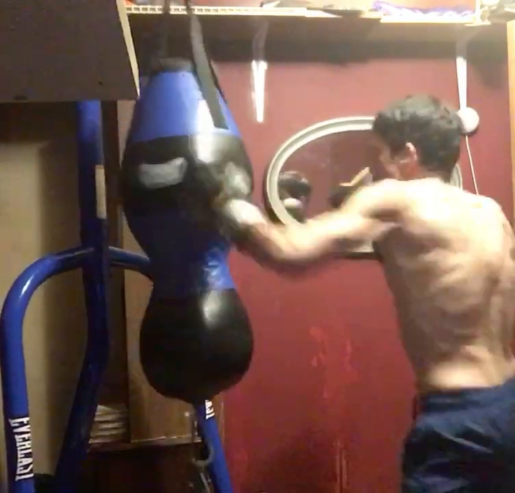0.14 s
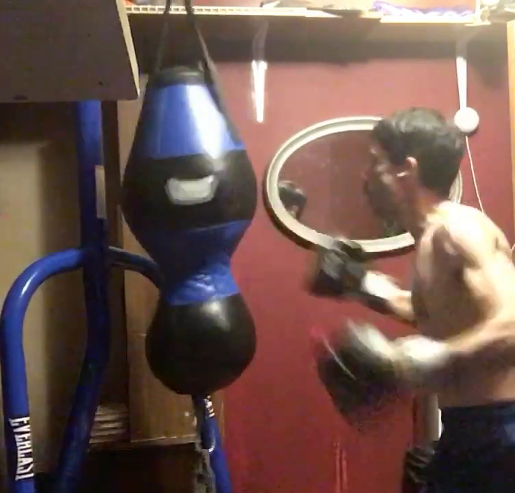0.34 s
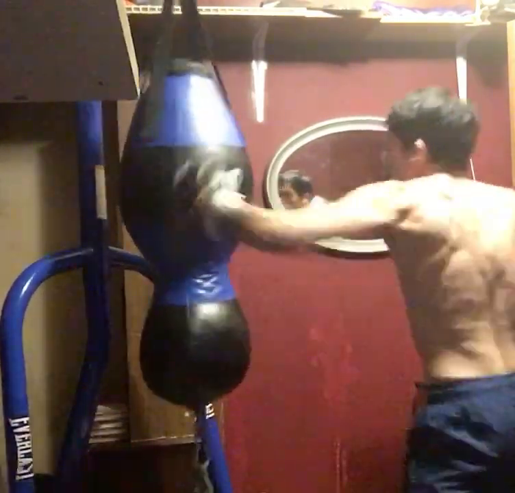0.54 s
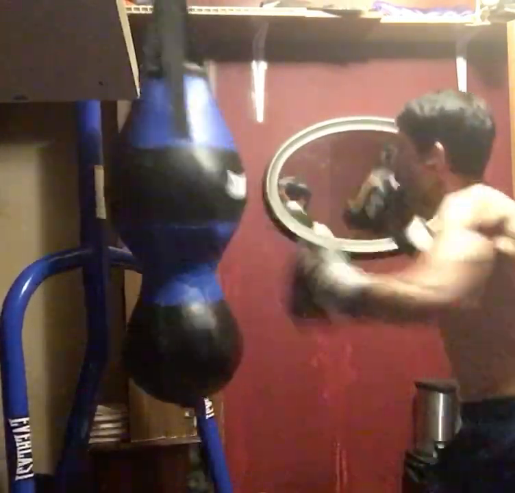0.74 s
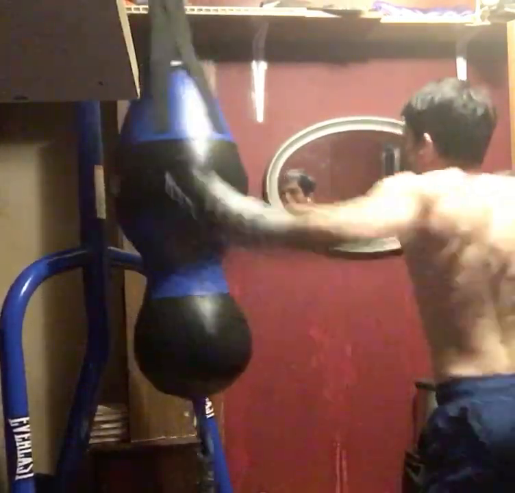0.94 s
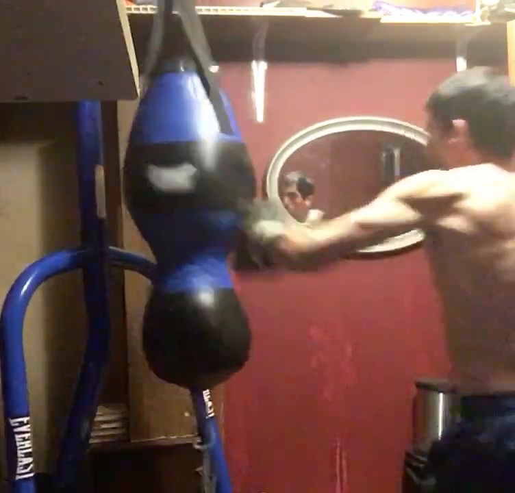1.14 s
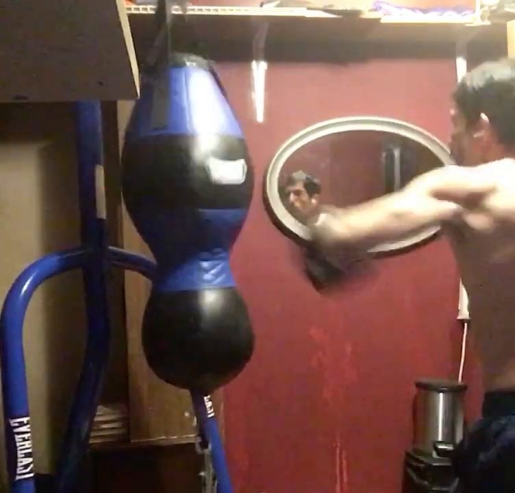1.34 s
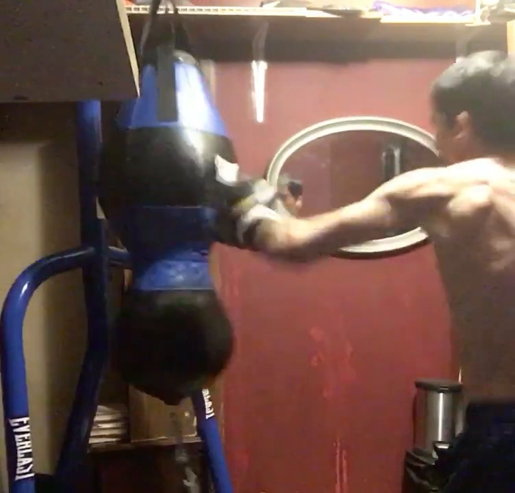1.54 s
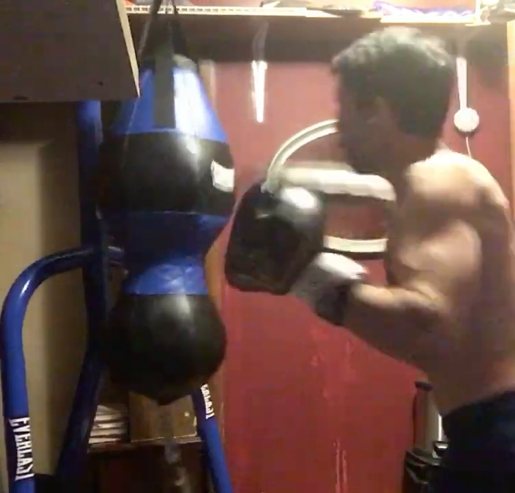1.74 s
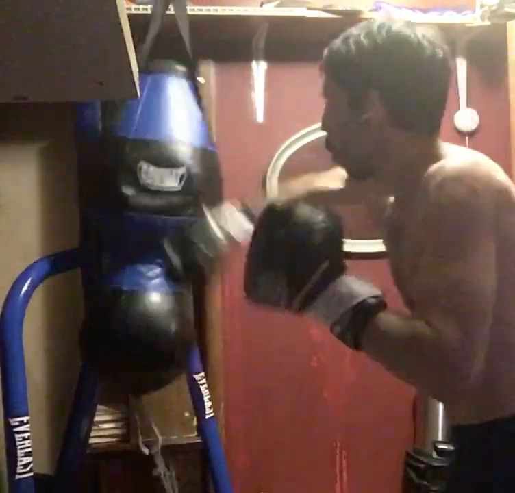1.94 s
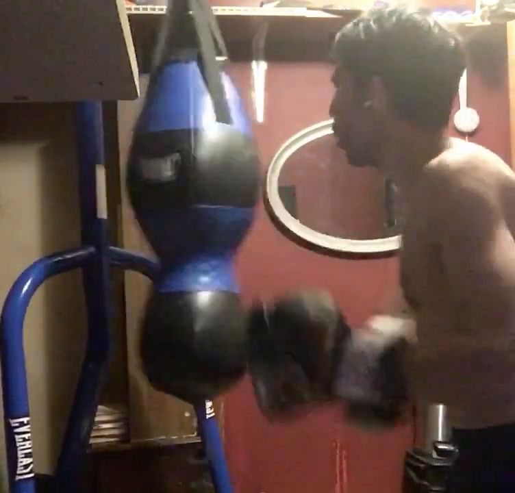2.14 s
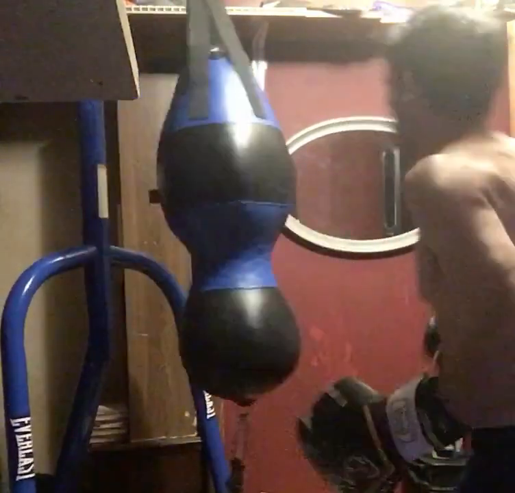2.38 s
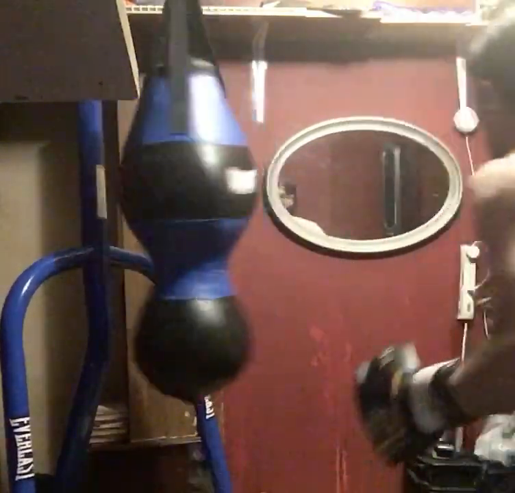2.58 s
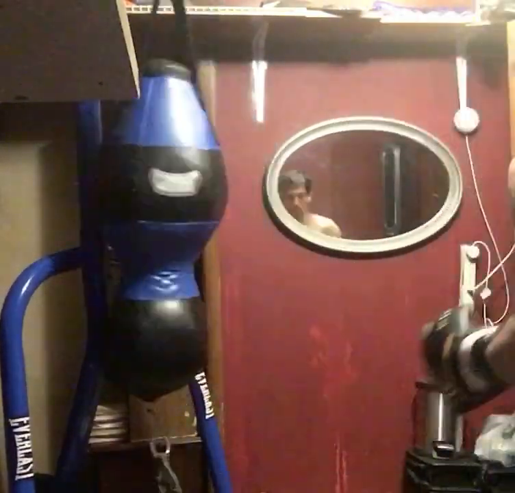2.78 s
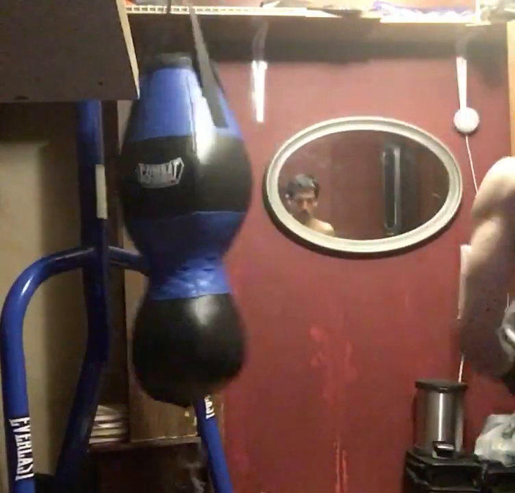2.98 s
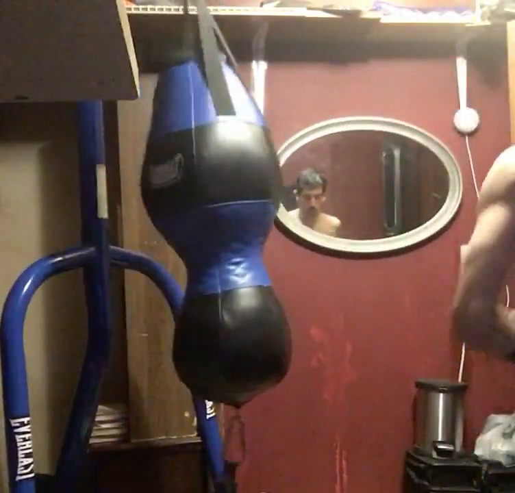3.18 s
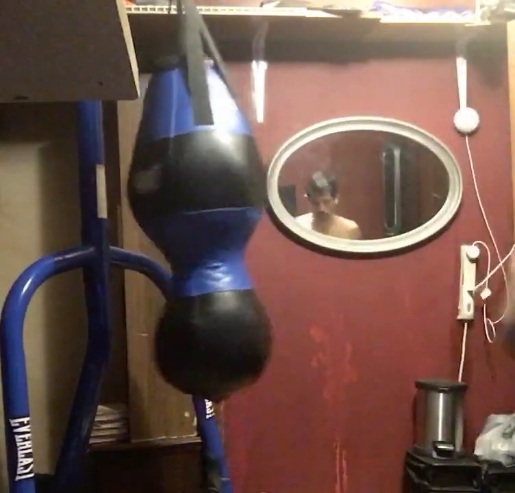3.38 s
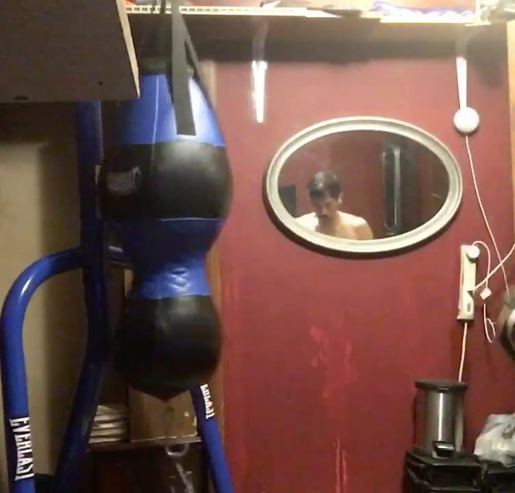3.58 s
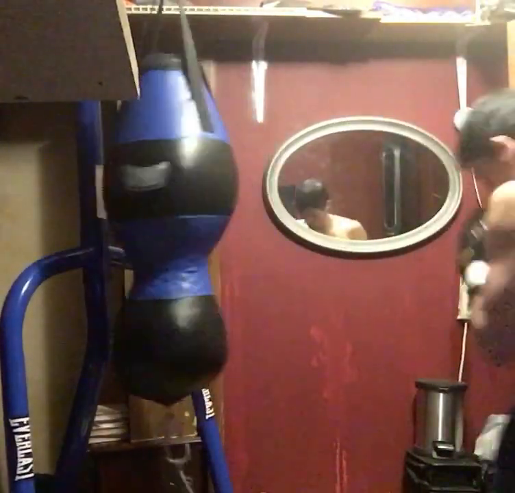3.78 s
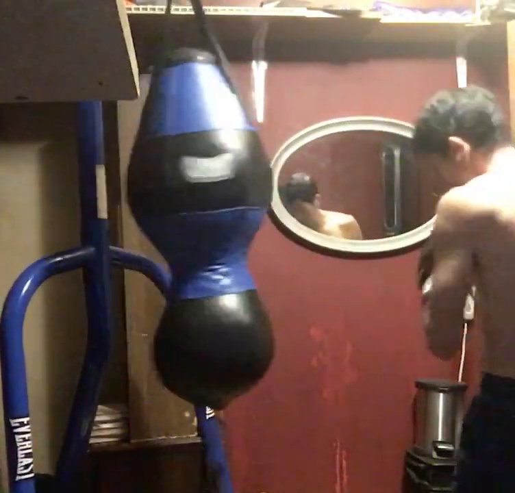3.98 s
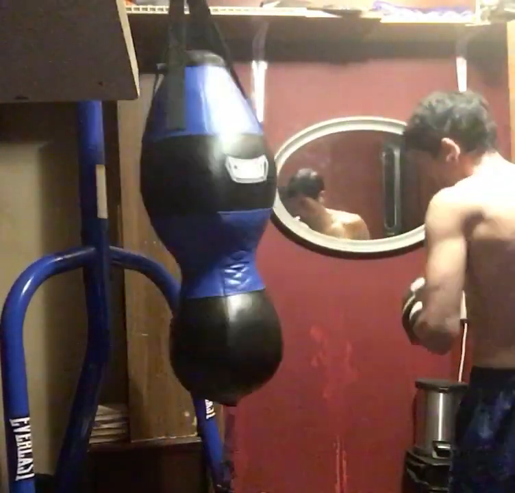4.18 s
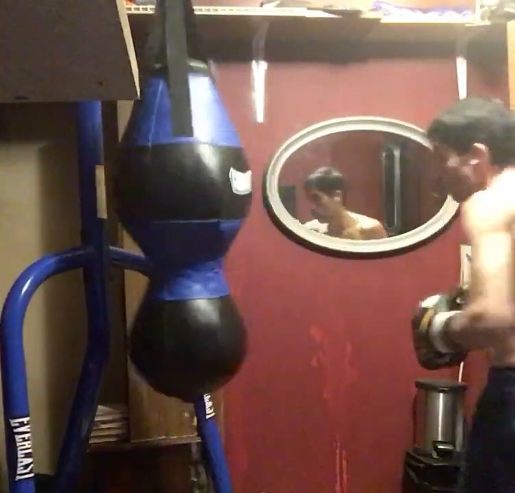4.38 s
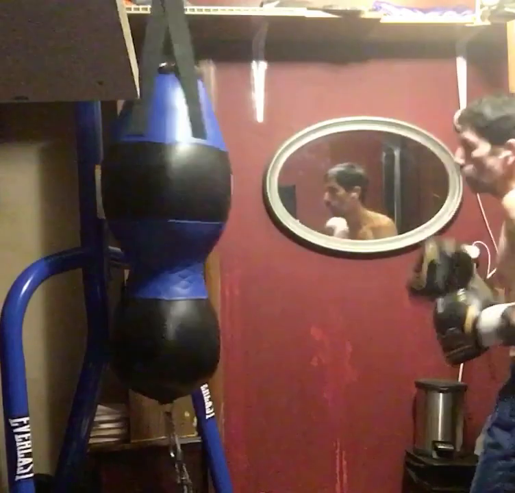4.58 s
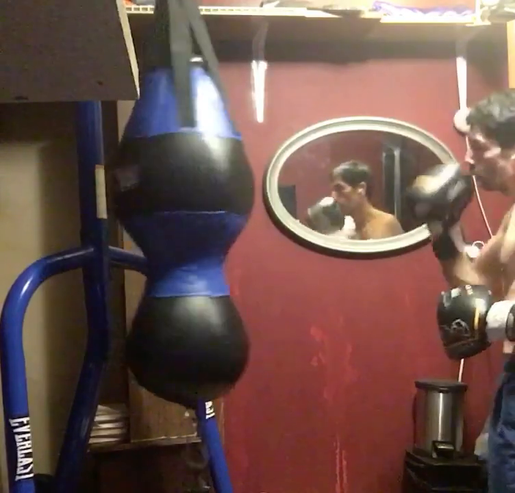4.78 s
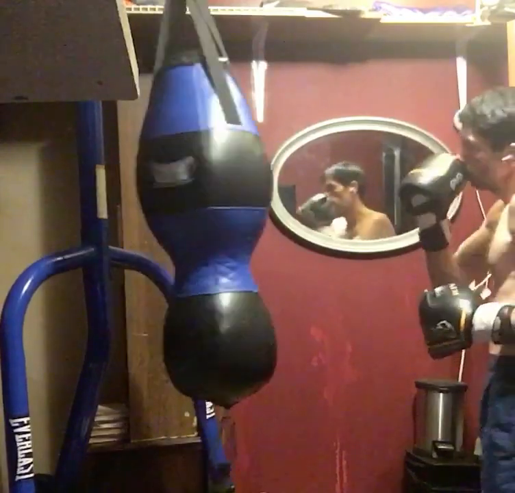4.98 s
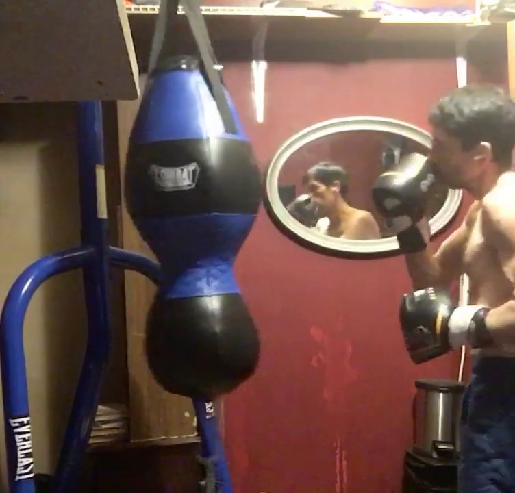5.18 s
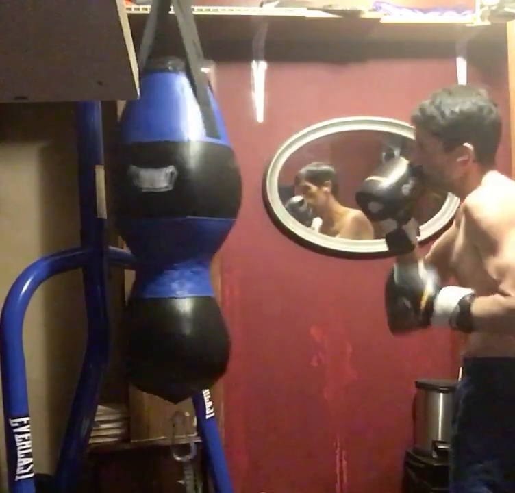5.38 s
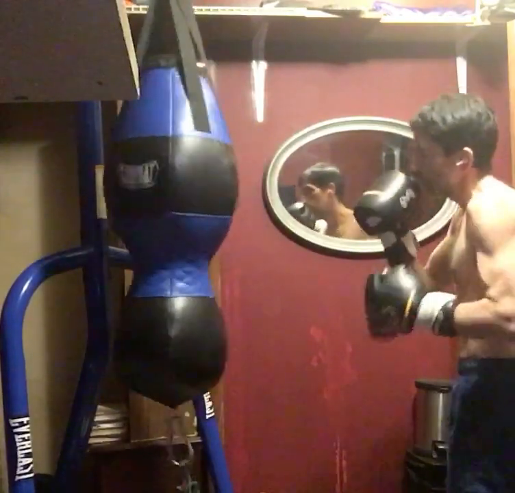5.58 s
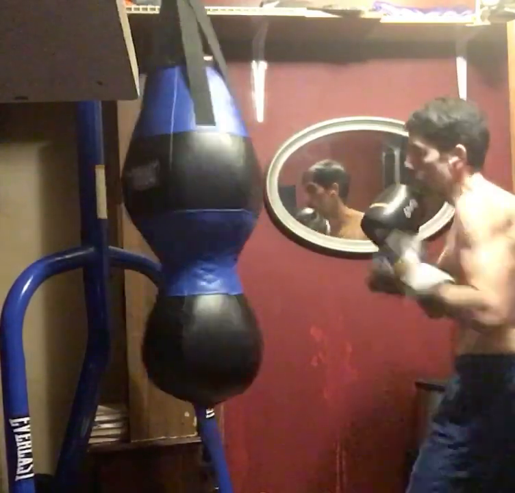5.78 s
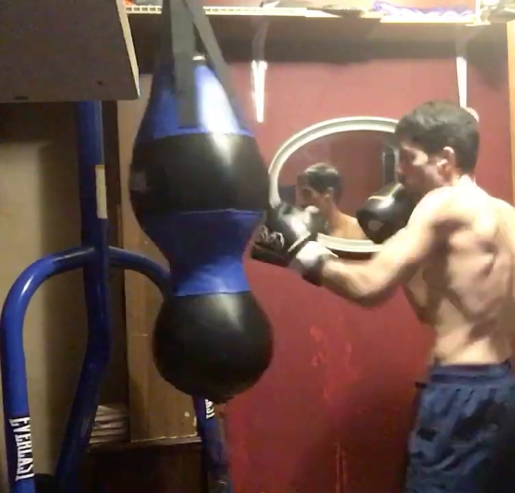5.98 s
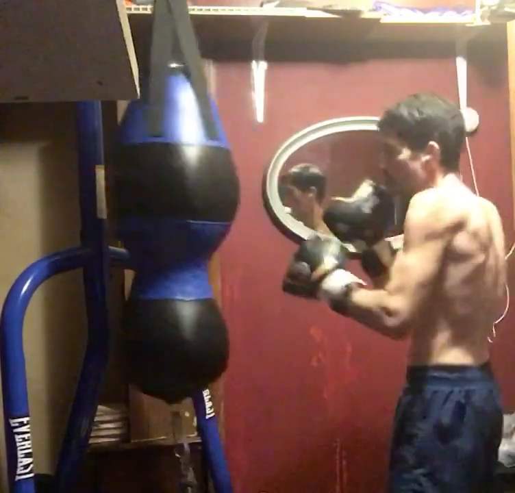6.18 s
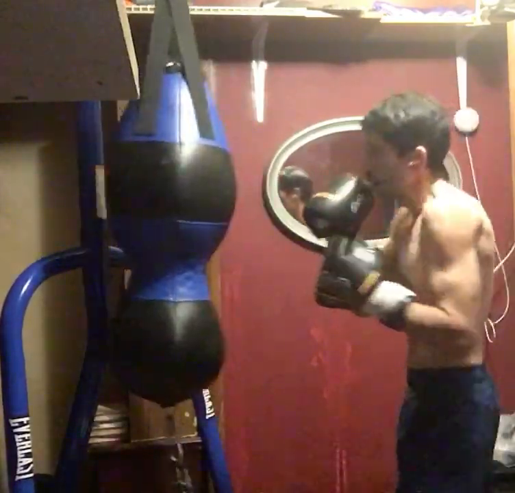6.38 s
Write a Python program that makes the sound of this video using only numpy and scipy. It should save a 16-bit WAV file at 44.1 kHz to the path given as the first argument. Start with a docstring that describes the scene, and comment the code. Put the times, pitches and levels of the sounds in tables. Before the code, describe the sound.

A small hard-walled room with quiet low room noise, faint cloth rustle and a short echo. Gloved punches hit a hanging bag at about 0.0, 0.5, 0.9, 1.35 and 1.7 seconds: sharp leather cracks with brief hiss and a hollow low ring, the fourth softer. Quick swishes lead into all but the first. Between them shoes scuff, the stand and chain rattle, feet bump, the hook squeals thinly and straps creak. From 1.75 to 2.9 the rattling continues, with a steel ring tinking high from 1.85 and a bright rubber sole squeak at 2.2. From 3 to 5 it is nearly quiet: faint rubbing, wavering metal squeals near 3.7 and 4.1, weak creaks, a dull bump. A small knock comes at 5.4, one soft punch at 5.8, then slight rattles until 6.4. A small nearby microphone gives thin bass and slightly squashed peaks.

```python
"""Over quiet room noise and a faint rustle, gloved punches land on a hanging bag: leather hiss and a ringing body.
From the start shoes scuff and the stand rattles (grainy noise), a hook squeals (wavering tones), feet and
stand bump (low noise) and straps creak (rough partials); a swish of noise comes before all blows but the first.
Near two seconds a steel ring is knocked (pure notes) and a rubber sole squeaks (bright partials).
Weaker rubbing, squeals, creaks and bumps follow, with one last soft blow near six seconds."""
import sys
import numpy as np
from scipy import signal
from scipy.fft import rfft, irfft
from scipy.io import wavfile

SR = 44100
rng = np.random.default_rng(int(sys.argv[2]) if len(sys.argv) > 2 else 0)


def store_pcm(level_fs):
    """Save levels as 16-bit WAV."""
    pcm = np.round(np.clip(level_fs, -1, 1) * 32767).astype(np.int16)
    wavfile.write(sys.argv[1], SR, np.atleast_2d(pcm).T)


def boost_factor(decibels):
    """Convert a level in decibels to a linear amplitude factor."""
    exponent = np.asarray(decibels, float) / 20
    return 10 ** exponent


N = 283563  # length in samples


def evened(x):
    """Scales to rms 1."""
    return x / np.sqrt(np.mean(x ** 2) + 1e-20)


def read(points, hz):
    """Looks a curve up on a log-frequency axis."""
    f, value = np.transpose(points)
    return np.interp(np.log(hz + 1), np.log(f + 1), value)


def add(mix, s, sound):
    """Mixes a sound in at s seconds."""
    part = mix[max(round(s * SR), 0):][:len(sound)]
    part += sound[:len(part)]


def coloured(size, db_at):
    """Noise of rms 1 with the spectrum shape db_at(hz)."""
    hz = np.fft.rfftfreq(size, 1 / SR)
    white = rng.standard_normal(size)
    return evened(irfft(rfft(white) * boost_factor(db_at(hz)), size))


def wobble(size, hz):
    """Slow random drift of rms about 1, mostly below hz, with no constant part."""
    return coloured(16384, lambda f: -12 * (f / hz) ** 2 - 200 * (f < 1))[:size]


def swell(length, rise, fade_db):
    """Times and an envelope: soft start, a fade that steepens, soft end."""
    t = np.arange(0, length, 1 / SR)
    fade = boost_factor(fade_db * (t / length) ** 2)
    soft_end = np.minimum((length - t) / 0.0062, 1)
    return t, np.minimum(t / rise, 1) * fade * soft_end


FLIP_HZ = 218  # modes above this start in the opposite direction, so the pair around it swells as it beats
STRAY_TURNS = 0.23  # full spread of the starting points, in turns


def rings(modes, size):
    """Decaying modes struck together, with a little chance in start and strength."""
    t = np.arange(size) / SR
    total = np.zeros(size)
    for hz, db, t60 in modes:
        start_luck, strength_luck = rng.random(2)
        turns = hz * t + STRAY_TURNS * (start_luck - 0.5)
        strength = np.sign(FLIP_HZ - hz) * (1 + 0.47 * strength_luck)
        total += strength * boost_factor(db - 60 * t / t60) * np.sin(2 * np.pi * turns)
    return total


# colour of the room noise: (frequency [Hz], relative level [dB per Hz])
AIR_COLOUR = [(26, -30), (55, 7.5), (110, 5.5), (155, -8), (235, 0), (450, -5.5), (700, -17), (1240, -7.5),
              (2230, -24), (4450, -16.5), (7860, -27.5), (14900, -24), (16500, -38.5)]
# colour of the rustle: (frequency [Hz], relative level [dB per Hz])
CLOTH_COLOUR = [(290, -0.5), (500, -6.5), (579, -6.5), (700, 0), (885, -8), (1410, -6.5), (4550, -10),
                (7600, -16), (14700, -17), (15800, -19), (16500, -28)]
# faint shuffling of feet and cloth on top of the still room: (time [s], level [dB])
RUSTLE = [(0.0, -40), (0.25, -43), (0.55, -42), (0.8, -45.5), (1.45, -52.5), (1.651, -58.5), (1.86, -44),
          (2.15, -49), (2.47, -54), (2.78, -51.5), (2.97, -57.5), (3.29, -55.5), (3.85, -56), (3.95, -71),
          (4.67, -60.5), (5.03, -53.5), (5.69, -62.5), (6.43, -66)]
AIR_DB, FLICKER_DB = -61, 1.6  # rms level of the air; rms swing of the rustle's level


def background():
    """Steady room noise, and a grainy rustle above it whose level moves and flickers."""
    air = coloured(N + 1, lambda hz: read(AIR_COLOUR, hz))[:N]
    rustle = coloured(N + 1, lambda hz: read(CLOTH_COLOUR, hz))[:N]
    flicker = coloured(N + 1, lambda hz: -12 * (hz / 25) ** 2)[:N]
    s, db = np.transpose(RUSTLE)
    rustle_db = np.interp(np.arange(N) / SR, s, db) + FLICKER_DB * flicker
    return boost_factor(AIR_DB) * air + boost_factor(rustle_db) * rustle


# blows; levels scale the three parts of each blow:
# (time [s], slap level [dB], thump level [dB], push level [dB], skin tilt [dB per octave])
PUNCHES = [(0.0074, -10.5, -20, -25.5, -3), (0.4681, -7.5, -22, -19, 8.5), (0.9099, -7, -27, -20.5, 13.5),
           (1.3453, -16, -25.5, -26.5, -4), (1.683, -10, -22.5, -23, 1), (5.8348, -20.5, -36.5, -31.5, -4)]
# leather on leather, before the tilt: (frequency [Hz], relative level [dB per Hz])
LEATHER_COLOUR = [(300, -29), (520, -5), (900, -4), (1650, -3.5), (2500, -10), (5200, -11.5), (7600, -17.5),
                  (13700, -19.5), (15600, -19), (16500, -39)]
# the bag's stuffing: (frequency [Hz], relative level [dB], t60 [s])
FILLING = [(72, -7, .15), (92, -8, .15), (107, -2.5, 0.18), (142, -11, 0.17)]
# the whole bag: (frequency [Hz], relative level [dB], t60 [s])
BODY = [(204, 4, .12), (232, 4.5, .13), (262, -5, .09)]
# the bag's skin, before each blow's tilt: (frequency [Hz], relative level [dB], t60 [s])
SKIN = [(296, 2, 0.18), (329.5, -1.5, .14), (370.8, 1, .13), (413.7, -3.5, .1), (460, -10.5, .08),
        (610, -13, .1), (700, -19, .1)]
SLAP_TILT_DB = 4.5  # per octave, for a slap of 0 dB
TILT_PER_DB = 0.3243  # harder blows crack brighter: dB per octave for each dB of slap
SKIN_RISE_S, BODY_RISE_S, PUSH_RISE_S = 0.00046, 0.01, 0.0033


def punch(slap_db, thump_db, push_db, skin_tilt_db):
    """A sharp crack and leather hiss, the bag's modes pressed by the glove, and a low push."""
    t = np.arange(16384) / SR
    tilt_db = SLAP_TILT_DB + TILT_PER_DB * slap_db

    def leather(hz):
        return read(LEATHER_COLOUR, hz) + tilt_db * np.log2((hz + 1) / 3000)

    # unlike noise towards the microphone and three walls
    noise = np.array([coloured(len(t), leather) for way in range(4)])
    hiss_fade = boost_factor(-4.5 - 60 * t / 0.04)
    crack_fade = boost_factor(-1 - 60 * t / 0.013)
    slap = noise * (hiss_fade + crack_fade) * np.minimum(t / 0.00051, 1)
    tilted_skin = [(hz, db + skin_tilt_db * np.log2(hz / 250), t60) for hz, db, t60 in SKIN]
    thump = rings(tilted_skin, len(t)) * np.minimum(t / SKIN_RISE_S, 1)
    thump += rings(BODY, len(t)) * np.minimum(t / BODY_RISE_S, 1)
    push = rings(FILLING, len(t)) * np.minimum(t / PUSH_RISE_S, 1)
    stuffing = boost_factor(1.5 * wobble(len(t), 40))  # the loose filling shifts and roughens the ring
    return slap * boost_factor(slap_db), (boost_factor(thump_db) * thump + boost_factor(push_db) * push) * stuffing


# how long the echo lasts: (frequency [Hz], t60 [s])
ROOM = [(100, 0.61), (250, 0.27), (600, 0.28), (1500, 0.23), (4000, 0.28), (10000, 0.24), (16000, 0.21)]


def room(x, scattered):
    """Sparse echoes of random sign, one in every 20 samples, each band dying at its own speed."""
    taps = np.zeros((3, SR // 2))
    slots = np.arange(100, SR // 2 - 20, 20)
    at = slots + rng.integers(0, 20, (3, len(slots)))
    np.put_along_axis(taps, at, rng.choice([-1., 1.], at.shape), 1)
    hz, t, z = signal.stft(taps, SR, nperseg=512)
    decay = boost_factor(-60 * t / read(ROOM, hz)[:, None])
    tails = signal.istft(z * decay, SR, nperseg=512)[1]
    # three tails in turn, so that like sounds differ
    turn = np.pi * (np.arange(N) / SR / 1.3 + np.arange(3)[:, None] / 3)
    fed = x * np.cos(turn) * np.sqrt(2 / 3) + scattered / np.sqrt(3)
    return signal.oaconvolve(fed, tails / np.linalg.norm(tails[0]), axes=1).sum(0)[:N]


# scuffs and rattles; levels are before scuff()'s 12.5 dB cut:
# (time [s], level [dB], brightest pitch [Hz], low end [dB], top end [dB], contact [s])
SCUFFS = [(0.094, -19.5, 5200, -43, 7.5, 0.023), (0.222, -28.5, 1427, -1.5, 2.5, 0.023),
          (0.336, -21.5, 4850, -14, 16, 0.018), (0.589, -25, 3700, -40, 2.5, 0.018),
          (0.633, -20, 4030, -1.5, 16, 0.022), (0.771, -28.5, 4600, -37, 11.5, .019),
          (1.017, -36, 4700, -13, 9, 0.038), (1.2, -33.5, 3100, -10, 9, 0.019),
          (1.243, -29.5, 6970, -6, 11, 0.017), (1.587, -42.5, 5600, -39, 8, 0.019),
          (1.757, -16.5, 4240, -11, 6, 0.014), (1.934, -14.5, 4500, -2.5, 5.5, 0.015),
          (2.018, -28.5, 5100, 13, 17, 0.0056), (2.151, -26.5, 3050, 2, 9.5, 0.021),
          (2.189, -16.5, 4930, -5, 8, .011), (2.21, -16, 3400, -6.5, 10.5, 0.019),
          (2.605, -18, 3220, -8.5, 3, 0.021), (2.832, -41, 3430, -14, 4, 0.012),
          (2.96, -42.5, 4750, -44, 11, 0.018), (3.103, -37.5, 3020, -1.5, 1, 0.013),
          (3.228, -41, 5200, -44, 0, .012), (3.69, -41.5, 4800, -1, 6, 0.097),
          (3.742, -41.5, 6440, 4, -6, 0.029), (4.107, -40, 4770, -21, -7.5, 0.014),
          (4.186, -42.5, 4760, -6, 5, .03), (4.606, -39, 2970, -29, 2, 0.0031),
          (4.736, -44.5, 2950, 7, 7.5, 0.021), (4.991, -46, 5100, 21, -19, 0.005),
          (5.408, -32.5, 1090, 8, 5, 0.0074), (5.425, -39.5, 5000, -24, 2, 0.015),
          (6.022, -28.5, 3280, -6, 7.5, 0.0061), (6.127, -45.5, 4110, 4.5, 2.5, .016),
          (6.269, -51, 2820, 6, -2, 0.024)]
# basic colour of rubbing: (frequency [Hz], relative level [dB per Hz])
RUB_COLOUR = [(310, -31.5), (520, 3), (1030, 1), (1220, 8), (4360, -3.5), (10200, -17), (12400, -10.5),
              (15600, -15.5), (16500, -36.5)]
# links under the bag, before scuff() scales width and level: (frequency [Hz], width [Hz], level [dB])
CHAIN = [(1450, 27, -14.5), (3520, 170, -6.5), (4544, 160, -7), (4530, 43, -11), (5330, 35, -2),
         (6970, 33, -11.5), (7270, 19, -7), (6200, 14, -6), (8420, 52, 20.5), (9170, 2000, -2.5),
         (9340, 76, 2.5), (10000, 27, -4.5), (10700, 11, -25.5), (12200, 25, -7), (12640, 430, -11),
         (13600, 38, -17)]
SCUFF_RISE, SCUFF_FADE = 0.29, 4.5  # rise and fade t60 as multiples of the contact time
LINKS_DB = 7  # base level of the links


def scuff(db, peak_hz, low_db, top_db, rise, hold, t60):
    """Grainy rubbing noise with one bright patch, ringing some chain links; it swells, holds and fades."""
    t = np.arange(16384) / SR
    shaken = rng.random(len(CHAIN))  # each link's share

    def colour(hz):
        patch_db = 5.2 * np.exp(-((hz - peak_hz) / 350) ** 2)
        tilt_db = read([(800, low_db), (3500, 0.015), (11000, top_db)], hz)
        links = 0
        for (f, width, link_db), share in zip(CHAIN, shaken):
            peak = 1 / (1 + ((hz - f) / (0.41 * width)) ** 2)
            links = links + share * boost_factor(LINKS_DB + 0.4 * link_db) * peak
        return read(RUB_COLOUR, hz) + tilt_db + patch_db + 20 * np.log10(1 + links)

    shape = np.minimum(t / rise, 1) * boost_factor(-60 * np.maximum(t - rise - hold, 0) / t60)
    grain = boost_factor(2.5 * wobble(len(t), 250))
    return boost_factor(db - 12.5) * shape * grain * coloured(len(t), colour)


# steel tube, before a 58 dB cut: (frequency [Hz], level [dB], t60 [s])
STAND = [(712, -1.5, 0.79), (1340, -6.5, 0.63)]


def stand(rattles):
    """The steel tubes ring along with the sounds that shake them."""
    return boost_factor(-58) * signal.oaconvolve(rattles, rings(STAND, SR))[:N]


# the hook slips and slows: (time [s], length [s], level [dB], first pitch [Hz], last pitch [Hz])
SQUEALS = [(.1, 0.072, -42, 5320, 5100), (.65, 0.051, -35.5, 4950, 4750), (.78, 0.045, -40, 4500, 4230),
           (1.01, .05, -43, 5060, 4384), (2.025, 0.063, -41, 5040, 4900), (2.331, 0.045, -47.5, 4950, 4780),
           (2.455, 0.085, -39.5, 5190, 5185), (2.868, .09, -42.5, 4990, 4590),
           (3.703, .16, -44.5, 4893, 4626), (3.923, 0.081, -55, 4655, 4620), (4.138, 0.18, -45, 4768, 4735),
           (5.8, 0.031, -47.5, 4600, 4310)]
# a chain link slips: (time [s], length [s], level [dB], first pitch [Hz], last pitch [Hz])
THIN_SQUEALS = [(2.51, 0.083, -58, 6000, 5670), (3.184, 0.0455, -51.5, 5830, 5970)]
# the hook's partials 1 to 3: relative level [dB]
HOOK_PARTIALS = [0, -13, -21]
# the link's partials 1 to 3: relative level [dB]
LINK_PARTIALS = [0, -1, -24]
HOOK_WAVER, LINK_WAVER = 0.008, 0.005  # pitch waver of firm slips, as a share
WEAK_DB, SMEAR_PER_DB = -46, 0.7  # a slip weaker than this wavers more: dB of waver for each dB


def squeal(length, db, first_hz, last_hz, partials_db, waver):
    """Metal slips on metal: a wavering tone with two overtones that flutters in strength."""
    t, shape = swell(length, 0.014, -7)
    hz = first_hz + (last_hz - first_hz) * (t / length) ** 1.6  # holds at first, then moves
    smear = waver * boost_factor(SMEAR_PER_DB * max(WEAK_DB - db, 0))
    turns = np.cumsum(hz * (1 + smear * wobble(len(t), 150))) / SR
    tone = sum(boost_factor(d) * np.sin(2 * np.pi * k * turns) for k, d in enumerate(partials_db, 1))
    return shape * tone * boost_factor(db + 5.4 * wobble(len(t), 50))


# feet landing and the stand rocking on the floor; levels are before bump()'s 2.5 dB lift:
# (time [s], level [dB], pitch [Hz], t60 [s])
BUMPS = [(0.11, -37, 61.9, 0.11), (0.345, -38, 123, 0.35), (0.598, -57, 205, 0.1), (0.657, -42.5, 213, 0.3),
         (0.716, -38.5, 103, 0.079), (0.798, -44.5, 229, 0.09), (1.253, -50.5, 338, 0.6),
         (1.77, -51, 143, 0.052), (2.096, -50, 286, 0.46), (2.627, -52, 254, 0.14), (3.106, -69, 120, 0.12),
         (3.577, -52, 61.3, 0.091), (5.406, -46, 285, 0.054), (6.32, -51, 101, 0.099)]


def bump(db, hz, t60):
    """A dull knock: noise in a wide low band, rising softly."""
    t = np.arange(8192) / SR
    body = coloured(len(t), lambda f: -8 * np.log2((f + 1) / hz) ** 2)
    return boost_factor(db + 2.5 - 60 * t / t60) * np.minimum(t / 0.0049, 1) * body


# the straps: (time [s], length [s], level [dB], first pitch [Hz], last pitch [Hz])
CREAKS = [(0.226, .11, -50.5, 723, 712), (0.346, .085, -38.5, 689, 688), (1.443, .16, -66, 700, 720),
          (2.828, 0.23, -55.5, 695, 671.4), (3.761, 0.22, -52, 685.4, 673), (4.218, .33, -56, 767, 802)]
SCOOP, SCOOP_S = 0.067, 0.0093  # a creak starts this share flat and slides up


def creak(length, db, first_hz, last_hz):
    """Uneven stick-slip pulses: a rough stack of partials that throbs."""
    t, shape = swell(length, 0.012, -6)
    glide = first_hz + (last_hz - first_hz) * t / length
    hz = glide * (1 - SCOOP * np.exp(-t / SCOOP_S))
    turns = np.cumsum(hz * (1 + 0.045 * wobble(len(t), 140))) / SR
    throb = boost_factor(3.5 * wobble(len(t), 70))
    stack = sum(boost_factor(-13 * np.log2(k)) * np.sin(2 * np.pi * k * turns + k * k) for k in range(1, 9))
    return shape * stack * boost_factor(db) * throb


SWISH_S = 0.014  # lead before the blow, and rise time


def swish(slap_db):
    """The glove's rush just before it lands: scuff noise that swells, weaker than the slap."""
    return scuff(slap_db - 14, 4500, -16.5, 0.5, SWISH_S, 0, 0.035)


# a steel ring on the stand is knocked: (time [s], level [dB])
RING = [(1.846, -43), (1.897, -42.5), (2.275, -40.5), (2.36, -52), (2.45, -54), (2.705, -45),
        (2.765, -47.5), (2.81, -55)]


def steel_ring(db):
    """A thin pure note that dies away."""
    t = np.arange(16384) / SR
    hz, t60 = 3625, 0.28
    return boost_factor(db - 60 * t / t60) * np.minimum(t / 0.002, 1) * np.sin(2 * np.pi * hz * t)


# a rubber sole squeaks as it turns: (time [s], pitch [Hz], level [dB])
SOLE = [(2.194, 822.6, -39), (2.213, 860, -28), (2.234, 877, -48), (2.267, 878, -42), (2.33, 887, -75)]
# the sole's partials 1 to 8: relative level [dB]
SOLE_PARTIALS = [-6, 0, -1.5, 2, -0.5, -3, 3, -40]


def sole():
    """Fast, fairly even slips of rubber: a bright stack of partials."""
    s, *columns = np.transpose(SOLE)
    t = np.arange(s[0], s[-1], 1 / SR)
    hz, db = (np.interp(t, s, column) for column in columns)
    turns = np.cumsum(hz * (1 + 0.017 * wobble(len(t), 230))) / SR
    stack = sum(boost_factor(d) * np.sin(2 * np.pi * k * turns + k * k) for k, d in enumerate(SOLE_PARTIALS, 1))
    return signal.windows.tukey(len(t), 0.15) * stack * boost_factor(db + 3.5 * wobble(len(t), 66))


def scene():
    """All sounds play into the room; scuffs, rattles and swishes also ring the stand."""
    near, thumps, hook, *slaps = np.zeros((7, N))
    for s, *rub, contact in SCUFFS:
        add(near, s, scuff(*rub, SCUFF_RISE * contact, contact, SCUFF_FADE * contact))
    for s, slap_db, *_ in PUNCHES[1:]:
        add(near, s - SWISH_S, swish(slap_db))
    near += stand(near)
    for s, *blow in PUNCHES:
        slap, thump = punch(*blow)
        for way, noise in zip(slaps, slap):
            add(way, s, noise)
        add(thumps, s, thump)
    for s, *slip in SQUEALS:
        add(hook, s, squeal(*slip, HOOK_PARTIALS, HOOK_WAVER))
    for s, *slip in THIN_SQUEALS:
        add(hook, s, squeal(*slip, LINK_PARTIALS, LINK_WAVER))
    for s, *knock in BUMPS:
        add(thumps, s, bump(*knock))
    for s, *slip in CREAKS:
        add(near, s, creak(*slip))
    for s, db in RING:
        add(near, s, steel_ring(db))
    add(near, SOLE[0][0], sole())
    # the soft bag and the boxer swallow much of the bass;
    # the hook hangs in the straps, partly hidden from the walls
    to_walls = near + boost_factor(-11) * thumps + boost_factor(-3) * hook
    echo = room(to_walls, np.array(slaps[1:]))
    return (near + hook + slaps[0] + thumps + boost_factor(1) * echo + background())[None]


def low_pass(x):
    """Removes everything above the highest recorded frequency."""
    return signal.sosfilt(signal.butter(12, 16980, fs=SR, output="sos"), x)


def record(dry):
    """A small microphone: no deep bass, soft overload and a steep band limit."""
    thin = signal.sosfilt(signal.butter(3, 44, "high", fs=SR, output="sos"), dry)
    soft = 0.95 * np.tanh(thin / 0.95)
    edge = signal.firwin(511, 15800, window=("kaiser", 9), fs=SR)
    finished = signal.oaconvolve(soft, edge[None], "same")
    return low_pass(finished)


dry = scene()
out = record(dry)
store_pcm(out)
```